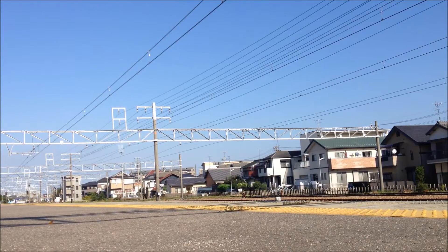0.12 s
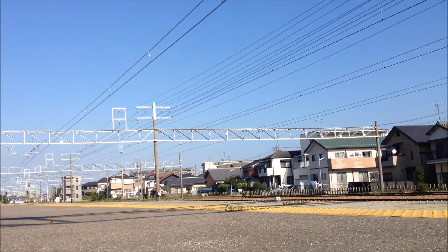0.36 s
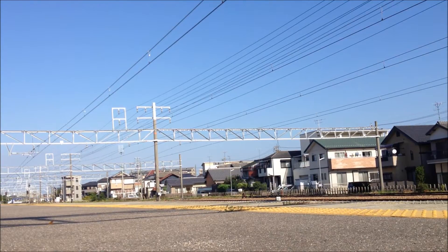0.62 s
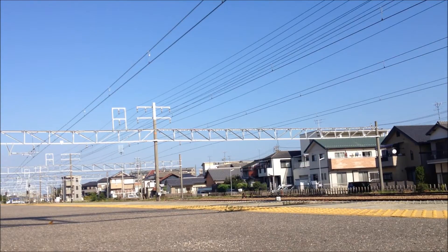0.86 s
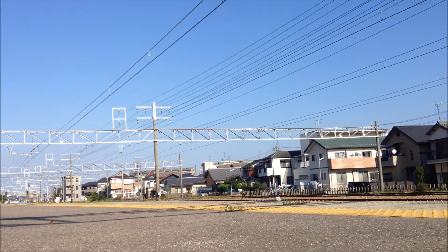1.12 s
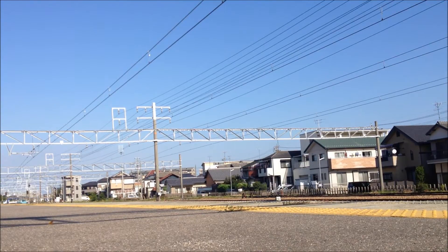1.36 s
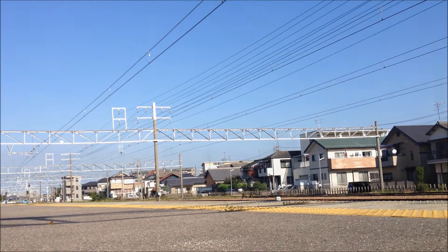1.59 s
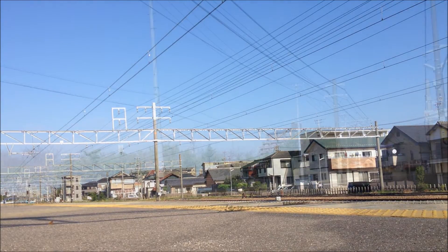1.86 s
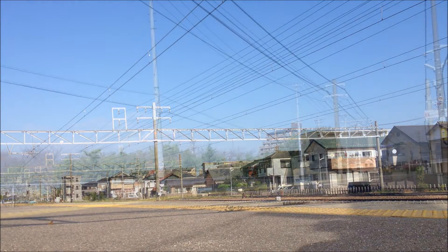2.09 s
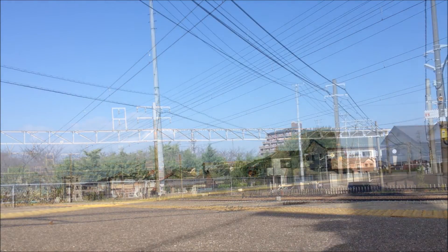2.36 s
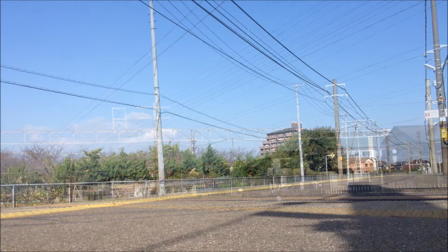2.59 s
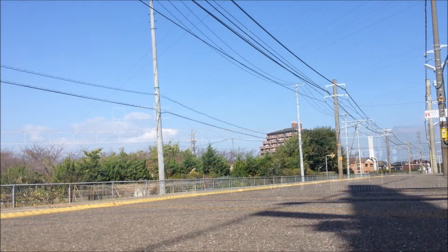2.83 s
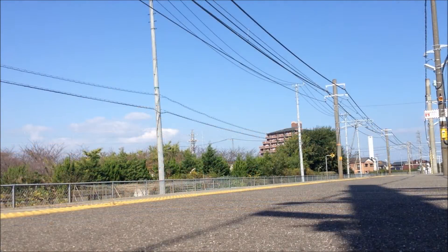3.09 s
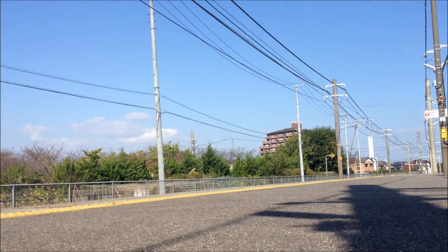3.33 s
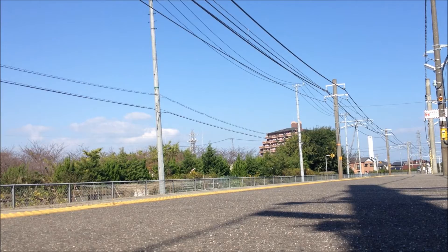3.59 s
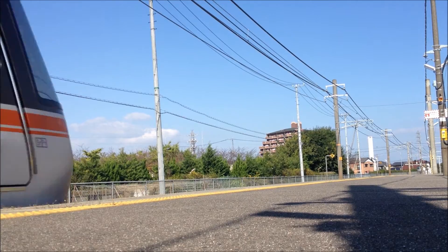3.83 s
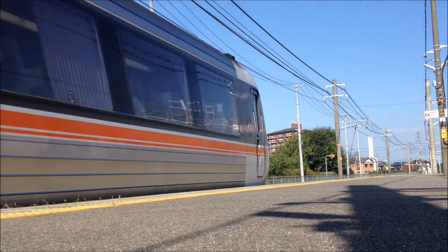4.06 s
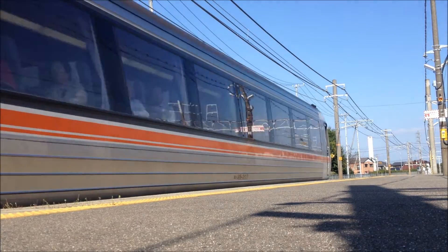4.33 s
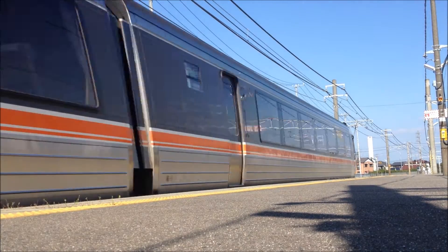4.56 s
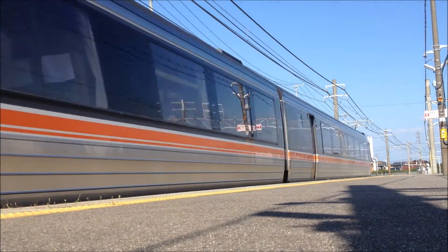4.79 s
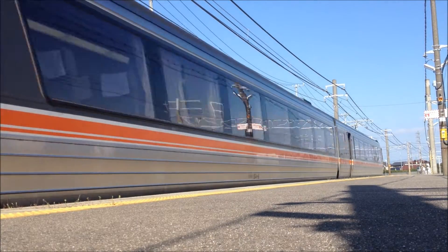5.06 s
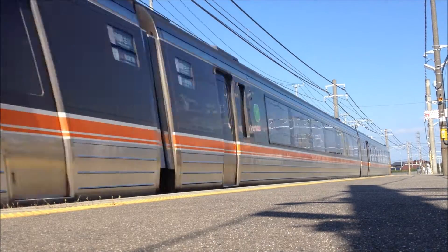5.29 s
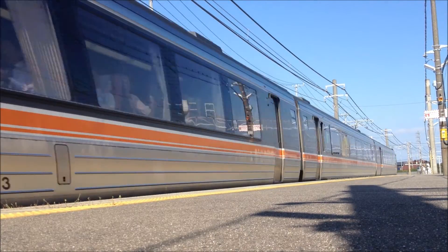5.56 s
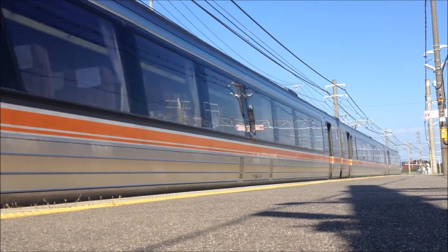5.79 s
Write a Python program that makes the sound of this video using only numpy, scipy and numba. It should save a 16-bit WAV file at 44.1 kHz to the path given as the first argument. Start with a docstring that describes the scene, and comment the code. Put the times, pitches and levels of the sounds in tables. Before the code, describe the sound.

Quiet platform with soft thuds and a dying train rumble, until a fast diesel train sweeps by close, droning, clattering and hissing.

```python
"""Heard from a platform edge: a diesel locomotive rolls away as flickering noise, ringing body panels and a thin
sine whistle, while someone nearby thuds and scuffs (short low tones, bursts of grit) and a few dry ticks follow.
Then a diesel express swells up and sweeps past car by car: engine tones on crankshaft orders and ringing wheels,
all dropping in pitch as each car passes, over wheel-on-rail roar, rattle and the hiss of air and exhaust.
The rail sings in short resonances, and late on a jet of air rushes by as three bands of noise."""
import sys
import numpy as np
from scipy import signal
from scipy.fft import rfft, irfft
from scipy.io import wavfile
from scipy.ndimage import uniform_filter1d
from numba import njit

SR = 44100
rng = np.random.default_rng(int(sys.argv[2]) if len(sys.argv) > 2 else 0)


def convert_level_to_amplitude(level_db):
    """Map a level in decibels to its linear amplitude factor."""
    exponent = np.asarray(level_db, float) / 20
    return 10 ** exponent


def log_audio(samples):
    """Write samples as a 16-bit WAV file to the path given in sys.argv[1]."""
    # one column per channel
    frames = np.atleast_2d(samples).T
    # limit to full scale, then quantise
    limited = np.clip(frames, -1, 1)
    pcm = np.round(limited * 32767).astype(np.int16)
    wavfile.write(sys.argv[1], SR, pcm)


N = 261072
T = np.arange(N) / SR

# express coming abreast; only the drop below the loudest row counts: start_s, level_db
EXPRESS_LEVEL = [(2.6, -49.5), (3.1, -41.5), (3.5, -34.5), (3.65, -29.5), (3.8, -24), (4.0, -23.5),
                 (4.35, -22.5), (4.9, -20), (5.27, -20.5), (5.5, -20), (5.8, -20.5), (5.92, -18)]
# roar, rattle, hiss, wheel ring of the express: loudest_db, steepness (dB per dB of level)
EXPRESS_LAYERS = [(-18, 0.98), (-29, 1.2), (-35.5, 1.35), (-24, 1.07)]
# engine drone, heard from further off; only the drop below the loudest row counts: start_s, level_db
DRONE_LEVEL = [(2.2, -61), (2.5, -53), (2.85, -45.5), (3.3, -39.5), (3.55, -32.5), (3.8, -23.5),
               (4.15, -29.5), (4.6, -26.5), (5.2, -24), (5.92, -22)]
# firing tone, overtones: loudest_db, steepness (dB per dB of level)
DRONE_LAYERS = [(-35.5, 1.14), (-23.5, 0.99)]
# cars of the express: abreast_s, crankshaft_turns_per_s (before the pitch shift of passing)
CARS = [(3.89, 27.6), (4.55, 27.1), (5.222, 27.0), (5.93, 27.0)]
# engine of each car: fifth_order_db, ninth_order_db, firing_swell_db, overtone_swell_db
ENGINES = [(-8.5, -11, 0.8, 3), (-17, -13, 8, 5), (-20, -11.5, 6, 8.5), (-15, -15, 5, 9)]
# even engine overtones: order (multiple of the crankshaft turns), level_db
EVEN_ORDERS = [(4, -19), (6, -0.5), (8, -13), (10, -16.5), (12, -26.5)]
# firing tone, even, odd overtones: loudest this long before the car is abreast (s)
SWELL_LEAD_S = (0.035, .17, -.08)
# firing tone, even, odd overtones: length of the swell (s)
SWELL_S = (0.22, 0.18, 0.32)
# wheel resonances: pitch_hz (before the shift), width_hz, level_db, share of the axle flare, extra distance loss (power)
WHEEL_MODES = [(1409, 128, 0, 0.85, .05), (674, 36, -10, 0.95, .05), (3840, 290, -9.5, .1, 1.2)]
# near axles make the wheel ring flare: peak_s, rise_db
AXLES = [(3.72, 6.5), (3.89, 14), (4.0, 11), (4.33, 5), (4.43, 6), (4.535, 9.5), (4.607, 9.5), (4.7, 2),
         (4.8, 3.5), (5.03, 5), (5.115, 4), (5.28, 10.5), (5.41, 1), (5.75, 0), (5.84, 4), (5.92, 3)]
# the rail sings under some bogies: peak_s, level_db, length_s, pitch_hz, width_hz
RAIL = [(3.862, -32.5, 0.37, 1970, 300), (4.624, -29.5, 0.27, 1990, 270), (4.55, -39.5, 0.23, 4720, 324),
        (5.168, -36, 0.31, 4700, 330), (5.167, -23, 0.27, 2006, 200), (5.89, -38, 0.11, 4800, 111.1),
        (5.9, -32, .15, 2000, 270)]
# whine, hiss and fizz of an air jet on one car: pitch_hz (before the shift), width_hz, level_db
JET = [(7200, 330, -37), (8200, 2800, -35), (13500, 6500, -42.5)]
# colour of the wheel-on-rail roar: pitch_hz, level_db (per Hz)
EXPRESS_ROAR = [(35, -19), (62, -36), (80, -15), (105, -24), (130, -11), (165, -2.5), (217, -8.5),
                (265, -6.5), (372, -8), (640, -7), (1040, -10.5), (1340, -11.5), (1700, -15), (2150, -15),
                (2510, -24), (3400, -28), (4420, -62)]
# colour of the rattle: pitch_hz, level_db (per Hz)
EXPRESS_RATTLE = [(1530, -30), (2600, 2.5), (3150, -2), (3680, -1), (4690, -1.5), (5220, -10), (5600, -12),
                  (7280, -15.5), (12300, -120)]
# colour of the air and exhaust hiss: pitch_hz, level_db (per Hz)
EXPRESS_HISS = [(2650, -20), (4500, -14), (5350, -0.5), (8610, -5.5), (10700, -12), (14600, -14.5),
                (15300, -20)]
# the hiss dips briefly: deepest_s, change_db, length_s
HISS_DIPS = [(4.356, -3, 0.42), (5.27, -1, 0.11), (5.82, -5.5, 0.28)]
# heel thuds: peak_s, peak_db, pitch_hz, length_s
THUDS = [(0.465, -38, 300, 0.014), (.482, -29, 227, .012), (.499, -24.5, 193, 0.0062),
         (0.717, -26, 302, 0.0093), (0.728, -31, 193, 0.016), (0.751, -29.5, 170, 0.008),
         (.894, -31, 150, 0.0099), (.911, -32, 161, 0.0078)]
# sole scuffs: peak_s, level_db, rise_s, fall_s, brightness_db
SCUFFS = [(0.529, -36, 0.023, 0.049, -2), (.773, -31.5, 0.016, .03, -4)]
# colour of the scuffing grit: pitch_hz, level_db (per Hz)
SCUFF_COLOUR = [(350, -33), (600, 2), (1260, -3.5), (1570, -5), (1950, -20), (2230, 0), (2730, -12),
                (4330, -8), (5240, -20.5), (8880, -26.5), (15300, -42)]
# faint dry ticks, sounded 4 dB below the listed level: start_s, level_db, pitch_hz
TICKS = [(1.8716, -58, 7460), (1.9194, -63, 7330), (2.4608, -49.5, 6210), (3.227, -41, 13500),
         (3.272, -44, 6960)]
# locomotive going away; only the drop below the loudest row counts: start_s, level_db
LOCO_LEVEL = [(0, -35), (.42, -39), (.7, -39.5), (1.05, -45), (1.5, -49), (2.2, -53.5)]
# roar, rumble, hiss of the locomotive: loudest_db, steepness (dB per dB of level)
LOCO_LAYERS = [(-36.5, 0.9439), (-41, 0.72), (-60, 0.89)]
# colour of its roar: pitch_hz, level_db (per Hz)
LOCO_ROAR = [(210, -15), (350, -9), (385, -13.5), (444, -4), (563, -3), (740, -11.5), (834, -7.5),
             (1110, -7.5), (1480, -13), (1680, -10), (2640, -20), (3050, -20), (4510, -26), (5140, -45),
             (6000, -38), (7800, -65), (13200, -120)]
# colour of its rumble: pitch_hz, level_db (per Hz)
LOCO_RUMBLE = [(29, -71), (50, -28), (98, -13), (210, -6), (248, -12), (322, -4.5), (420, -9.5), (550, -48),
               (920, -120)]
# colour of its hiss: pitch_hz, level_db (per Hz)
LOCO_HISS = [(2650, -26), (4500, 1), (5220, -11.5), (6950, -7), (8060, -10.5), (8830, -13.5),
             (15300, -26.5)]
# ringing body panels, level relative to the roar: pitch_hz, width_hz, level_db
LOCO_PANELS = [(337.5, 18, -14), (433, 48, -10.5), (559, 36, -11.5), (1102, 52, -9.5), (1580, 29, -17.5)]
# a thin whistle that comes and goes: start_s, length_s, level_db
WHISTLE = [(.955, .04, -61), (1.0, .15, -67), (1.15, 0.074, -59.5), (1.3, .035, -68), (1.52, .13, -64),
           (1.65, .15, -66), (1.85, .04, -64), (1.91, 0.081, -63), (2.04, .08, -71), (2.19, .035, -67)]

SPEED_M_S, TRACK_M, SOUND_M_S = 27, 5.48, 343  # train speed, distance to the track, speed of sound


def bump(at, length):
    """A smooth rise and fall, 1 at its top."""
    return np.exp(-((T - at) / (length / 2)) ** 2)


def layers(rows, table):
    """One level moves every layer of a train, each at its own steepness."""
    rise_db_s, fade_db_s = 20, 7.5  # slopes before and after the listed times
    s, level_db = np.transpose(rows)
    below_db = np.interp(T, s, level_db) - level_db.max()
    outside_db = rise_db_s * np.maximum(s[0] - T, 0) + fade_db_s * np.maximum(T - s[-1], 0)
    return [top_db + steepness * below_db - outside_db for top_db, steepness in table]


def unit(x, lo_hz=20, hi_hz=20000):
    """Scale so that the band lo-hi has rms 1."""
    power, hz = abs(rfft(x)) ** 2, np.arange(N // 2 + 1) * SR / N
    return x * N / np.sqrt(2 * power[(hz > lo_hz) & (hz < hi_hz)].sum())


def walk(rate):
    """Random levels held 1 / rate s and slewed twice; spread near 1."""
    held = np.repeat(rng.standard_normal(int(N / SR * rate) + 2), 8)
    slewed = uniform_filter1d(uniform_filter1d(held, 8), 8)
    return 1.3 * np.interp(T * rate * 8, np.arange(len(held)), slewed)


def rush(colour, flicker_db, rate, shared_db):
    """Coloured noise in half-octave bands that flicker alone and throb together."""
    hz, db = np.transpose(colour)
    octave = np.log2(np.arange(1, N // 2 + 2) * SR / N)
    shape_db = np.interp(octave, np.log2(hz), db, left=-90, right=-90)
    spectrum = rfft(rng.standard_normal(N)) * convert_level_to_amplitude(shape_db)
    out = 0
    for centre in np.arange(np.log2(hz[0]), np.log2(hz[-1]) + .5, .5):
        band = irfft(spectrum * np.clip(1 - 2 * abs(octave - centre), 0, 1), N)
        out = out + convert_level_to_amplitude(flicker_db * walk(rate)) * band
    return out * convert_level_to_amplitude(shared_db * walk(3 * rate))


@njit
def svf(x, hz, width):
    """State-variable band-pass with a moving centre, gain 1 there."""
    y, b, l = np.empty(len(x)), 0., 0.
    for i in range(len(x)):
        g, k = np.tan(np.pi * hz[i] / SR), width / hz[i]
        v = (b + g * (x[i] - l)) / (1 + g * (g + k))
        b, l, y[i] = 2 * v - b, l + 2 * g * v, k * v
    return y


def ring(hz, width, rough_db=0.5):
    """Noise in uneven bursts excites a resonance: two band-passes in a row, the second twice as wide."""
    drive = rng.standard_normal(N) * convert_level_to_amplitude(rough_db * walk(30))
    return unit(svf(svf(drive, hz, 1. * width), hz, 2. * width))


def steady(hz):
    """A pitch that stays put."""
    return np.full(N, 1. * hz)


def passing(at):
    """Doppler pitch factor and distance of a point of the train that is abreast at a given time."""
    along = SPEED_M_S * (T - at)
    metres = np.hypot(along, TRACK_M)
    return 1 / (1 + SPEED_M_S * along / metres / SOUND_M_S), metres


def shares(paths, steepness):
    """How much each car adds at each moment: near cars lead, and the powers sum to 1."""
    shade_db = 9  # an oncoming car hides the one behind it
    oncoming = np.array([np.clip((at - T) / .4, 0, 1) for at, _ in CARS])
    ahead = np.cumsum(oncoming, axis=0) - oncoming
    near = np.array([metres for _, metres in paths]) ** -steepness * convert_level_to_amplitude(-shade_db * ahead)
    return near / np.sqrt((near ** 2).sum(axis=0))


def express():
    """A passing train: engines, wheels, rail and air jet over flickering roar, rattle and hiss."""
    roar_db, rattle_db, hiss_db, wheel_db = layers(EXPRESS_LEVEL, EXPRESS_LAYERS)
    hiss_db = hiss_db + sum(db * bump(s, length) for s, db, length in HISS_DIPS)
    paths = [passing(at) for at, _ in CARS]
    roar = unit(rush(EXPRESS_ROAR, 0.29, 10, 0.7), 358, 1074)
    rattle = unit(rush(EXPRESS_RATTLE, 0.56, 14, 0.63), 3100, 6000)
    hiss = unit(rush(EXPRESS_HISS, 0.46, 10, 0.5), 5220, 6720)
    out = engine_drone(paths) + convert_level_to_amplitude(wheel_db) * wheel_ring(paths)
    out = out + convert_level_to_amplitude(roar_db) * roar + convert_level_to_amplitude(rattle_db) * rattle + convert_level_to_amplitude(hiss_db) * hiss
    return out + rail_song() + air_jet()


def engine_drone(paths):
    """Each car's engine by its nearness and pitch drop, swelling around the time it is abreast."""
    firing_db, overtone_db = layers(DRONE_LEVEL, DRONE_LAYERS)
    engines = 0
    # the platform edge hides the far wheels more than the deep drone, so these shares are less steep
    cars = zip(CARS, ENGINES, paths, shares(paths, 0.84))
    for (at, turns), (fifth_db, ninth_db, firing_up, overtone_up), (pitch, _), share in cars:
        swells = zip((firing_up, overtone_up, overtone_up), SWELL_LEAD_S, SWELL_S)
        swell_db = np.array([db * bump(at - lead, length) for db, lead, length in swells])
        engines = engines + share * convert_level_to_amplitude(swell_db) * engine(turns * pitch, fifth_db, ninth_db)
    return (convert_level_to_amplitude(np.array([firing_db, overtone_db, overtone_db])) * engines).sum(axis=0)


def engine(turns, fifth_db, ninth_db):
    """Firing tone, even and odd crankshaft orders of a six-cylinder diesel; each wavers as the firings vary."""
    phase = 2 * np.pi * np.cumsum(turns * (1 + 0.0014 * walk(5.06))) / SR

    def order(k, level_db):
        return convert_level_to_amplitude(level_db) * np.sin(k * phase + 2 * np.pi * rng.random())

    firing = order(3, 1.5 * walk(6))  # three firings per turn
    even = sum(order(k, db + 1.8 * walk(11)) for k, db in EVEN_ORDERS)
    odd = sum(order(k, db + 1.8 * walk(11)) for k, db in [(5, fifth_db), (9, ninth_db)])
    return np.sqrt(2) * np.array([firing, even, odd])


def wheel_ring(paths):
    """Rail roughness shakes the wheel resonances of every car; they flare with near axles and drop in pitch."""
    flare_db = sum(db * bump(s, 0.082) for s, db in AXLES)
    out = 0
    for (pitch, metres), share in zip(paths, shares(paths, 1.14)):
        for hz, width, db, flare, loss in WHEEL_MODES:
            level = convert_level_to_amplitude(db + flare * flare_db) * (TRACK_M / metres) ** loss
            out = out + share * level * ring(hz * pitch, width)
    return out


def rail_song():
    """Rail resonances that swell and die at a steady pitch."""
    return sum(convert_level_to_amplitude(db) * bump(s, length) * ring(steady(hz), width) for s, db, length, hz, width in RAIL)


def air_jet():
    """Noise bands dropping in pitch as the jet passes; quick to arrive, softer to fade."""
    at, arrive_s, fade_s = 5.54, 0.19, 0.25
    pitch, _ = passing(at)
    jet = sum(convert_level_to_amplitude(db) * ring(hz * pitch, width, 1.0) for hz, width, db in JET)
    before = T < at
    return jet * np.exp(-(abs(T - at) / np.where(before, arrive_s, fade_s)) ** np.where(before, 4, 2))


def steps():
    """Heel thuds as short low tones, scuffs as gritty noise, ticks as dying bursts of bright noise."""
    out = np.zeros(N)
    for s, db, hz, length in THUDS:
        out += convert_level_to_amplitude(db) * bump(s, length) * np.cos(2 * np.pi * (hz * (T - s) + rng.random()))
    grit = unit(rush(SCUFF_COLOUR, 0.88, 49.5, .8))
    sand = svf(grit, steady(7000), 6000.)  # the bright part of the grit
    for s, db, rise, fall, bright_db in SCUFFS:
        shape = np.where(T < s, np.exp(-((T - s) / rise) ** 2), np.exp(-abs(T - s) / fall))
        out += convert_level_to_amplitude(db) * (grit + convert_level_to_amplitude(bright_db) * sand) * shape
    for s, db, hz in TICKS:
        shape = (T > s) * np.exp(-abs(T - s) / .0012)
        out += convert_level_to_amplitude(db - 4) * shape * unit(svf(rng.standard_normal(N), steady(hz), 6000.))
    return out


def locomotive():
    """Roar with ringing panels, rumble and hiss sink with distance; a thin whistle comes and goes."""
    roar_db, rumble_db, hiss_db = layers(LOCO_LEVEL, LOCO_LAYERS)
    rumble = unit(rush(LOCO_RUMBLE, 1.3, 7.5, 0.93), 80, 550)
    roar = unit(rush(LOCO_ROAR, 0.62, 9, 0.93), 416, 1260)
    panels = sum(convert_level_to_amplitude(db) * ring(steady(hz), width) for hz, width, db in LOCO_PANELS)
    hiss = unit(rush(LOCO_HISS, 0.27, 7.7, 1.0), 6350, 15000)
    return convert_level_to_amplitude(roar_db) * (roar + panels) + convert_level_to_amplitude(rumble_db) * rumble + convert_level_to_amplitude(hiss_db) * hiss + whistle()


def whistle():
    """A sine that wanders a few Hz and wavers in level, gated on and off with short ramps."""
    pitch_hz, edge_s = 3125, .008
    tone = np.sqrt(2) * np.sin(2 * np.pi * np.cumsum(pitch_hz + 3 * walk(11.9)) / SR)
    gate = 0
    for s, length, db in WHISTLE:
        inside_s = np.minimum(T - s, s + length - T)
        gate = gate + convert_level_to_amplitude(db) * np.clip(inside_s / edge_s + .5, 0, 1)
    return gate * tone * convert_level_to_amplitude(0.8 * walk(25))


def scene():
    """Express, steps and locomotive as one signal in both channels."""
    return np.tile(express() + steps() + locomotive(), (2, 1))


def band_limit(x):
    """A steep low-pass at the top of the band."""
    return signal.sosfilt(signal.butter(12, 15410, fs=SR, output="sos"), x)


def record(dry):
    """The microphone drops the deep bass and the top."""
    bass_cut = signal.butter(2, 73.5, "high", fs=SR, output="sos")
    top_cut = signal.ellip(8, .2, 60, 15350, fs=SR, output="sos")
    mix = signal.sosfilt(np.vstack([bass_cut, top_cut]), dry)
    return band_limit(mix)


dry = scene()
out = record(dry)
log_audio(out)
```